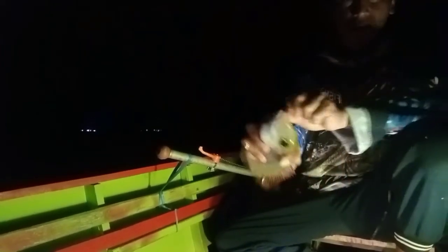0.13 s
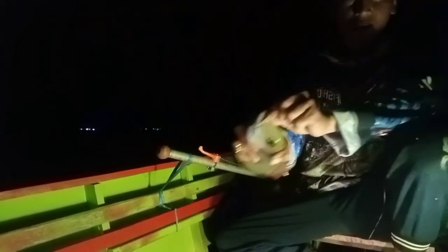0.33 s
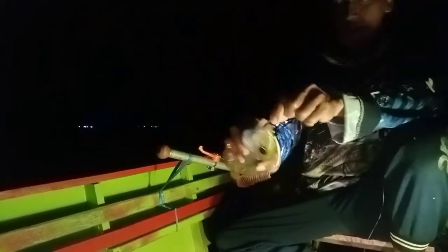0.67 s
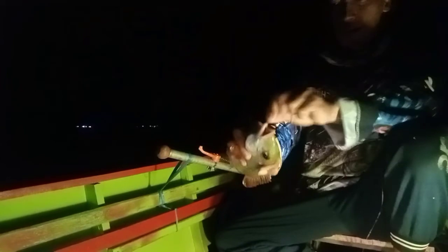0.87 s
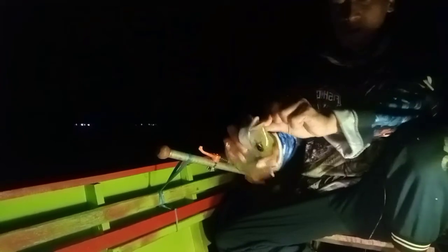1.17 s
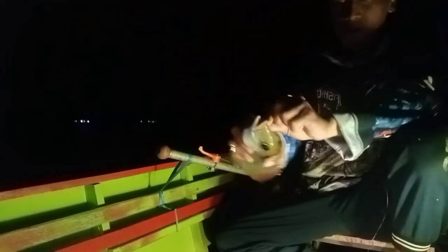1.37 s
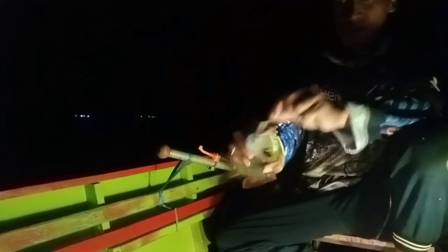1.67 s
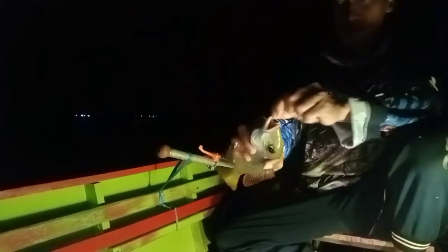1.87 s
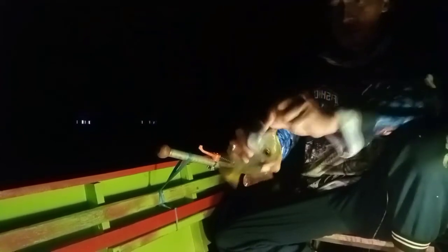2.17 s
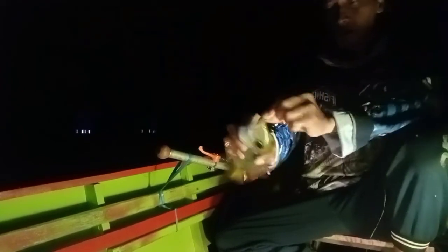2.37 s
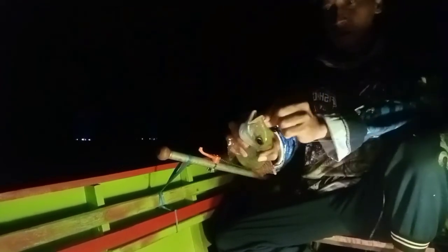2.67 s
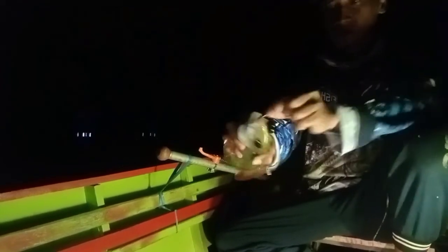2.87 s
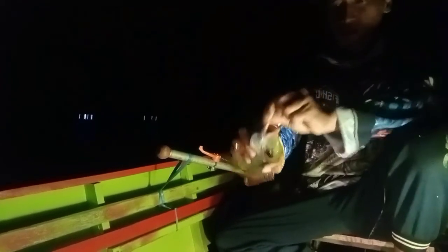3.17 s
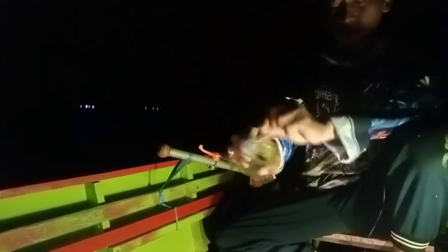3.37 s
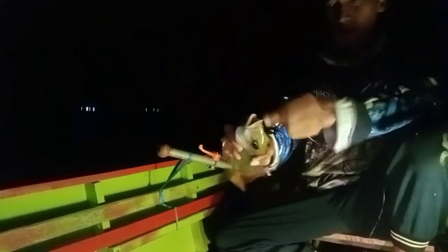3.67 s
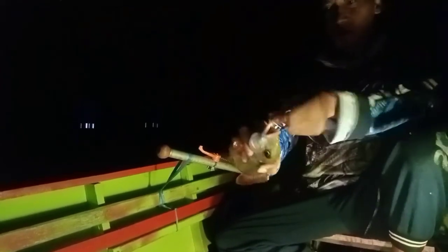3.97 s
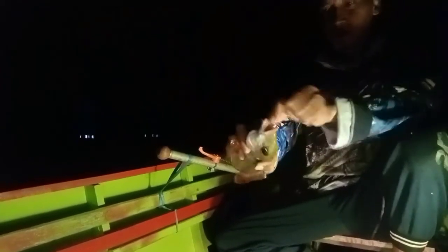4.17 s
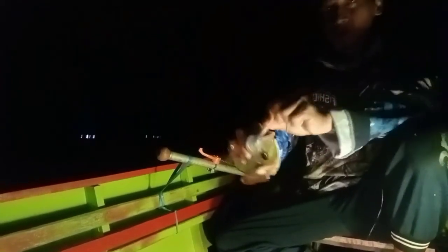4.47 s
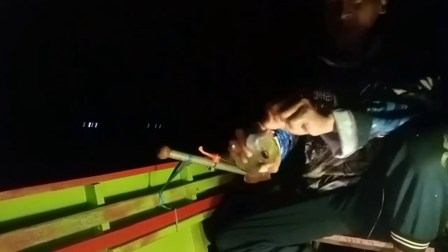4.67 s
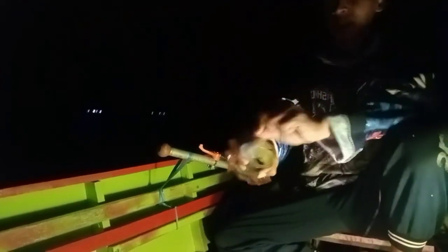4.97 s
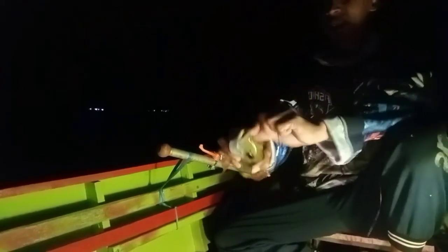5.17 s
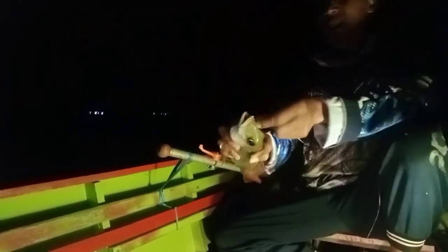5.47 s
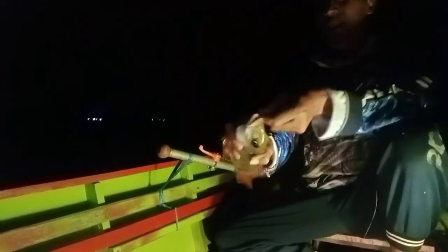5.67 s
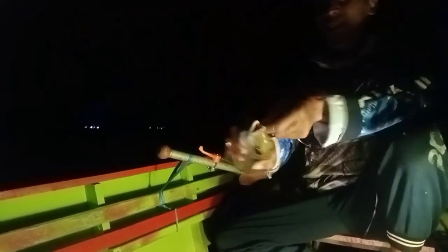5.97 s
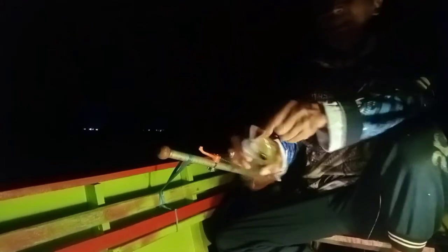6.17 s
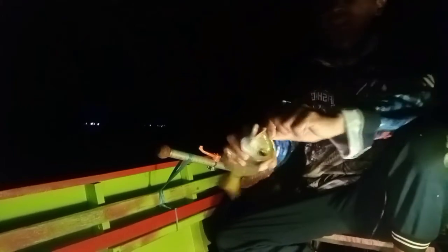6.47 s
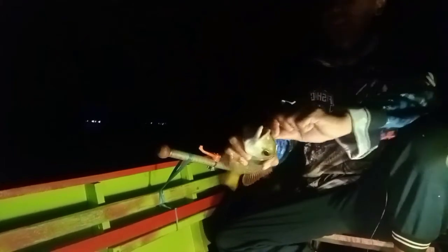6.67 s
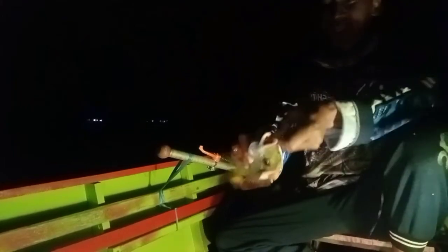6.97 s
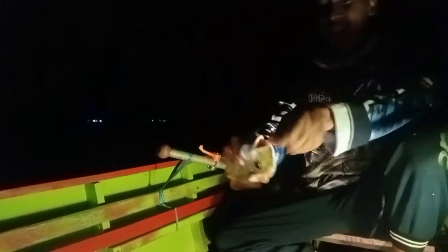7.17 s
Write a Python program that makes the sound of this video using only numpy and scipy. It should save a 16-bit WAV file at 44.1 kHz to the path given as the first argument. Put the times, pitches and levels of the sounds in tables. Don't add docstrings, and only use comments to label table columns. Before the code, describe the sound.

Sparse knocks, bright clicks and wet slaps on a hollow hull, with trickling water, rustling handling and a final heavy slap and low heave.

```python
import sys
import numpy as np
from scipy import signal
from scipy.io import wavfile

SR = 44100
rng = np.random.default_rng(int(sys.argv[2]) if len(sys.argv) > 2 else 0)


def magnitude_from_level(level_db):
    exponent = np.asarray(level_db, float) / 20
    return 10 ** exponent


def log_audio(samples):
    frames = np.atleast_2d(samples).T
    limited = np.clip(frames, -1, 1)
    pcm = np.round(limited * 32767).astype(np.int16)
    wavfile.write(sys.argv[1], SR, pcm)


N = 322787


def rms_one(x):
    return x / np.sqrt(np.mean(x ** 2) + 1e-20)


def peak_one(x):
    return x / (np.max(np.abs(x)) + 1e-20)


def add(track, sound, start_s):
    i = round(start_s * SR)
    track[i:i + len(sound)] += sound[:N - i]


def slow(rate_hz):
    r = np.exp(-80 * np.pi * rate_hz / SR)
    noise = rng.standard_normal(N // 40 + 2002)
    return rms_one(signal.lfilter([1], [1, -2 * r, r * r], noise)[2000:])


def filled(thin):
    return np.interp(np.arange(N) / 40, np.arange(len(thin)), thin)


def drift(rate_hz):
    return filled(slow(rate_hz))


def resonate(x, hz, width_hz):
    r = np.exp(-np.pi * width_hz / SR)
    feed = np.array([1, 0, -1]) * (1 - r * r) / 2
    return signal.lfilter(feed, [1, -2 * r * np.cos(2 * np.pi * hz / SR), r * r], x + 1e-18)


def twice(x, hz, width_hz):
    return resonate(resonate(x, hz, width_hz), hz, 2 * width_hz)


def coloured(spectrum, patchy_db, patch_rate):
    hz_points, db_points = np.transpose(spectrum)
    octaves = np.log2(hz_points[-1] / hz_points[0])
    edges = hz_points[0] * 2 ** np.arange(0, octaves + .3, 1 / 3)
    white = rng.standard_normal((2, N))
    together, out = slow(patch_rate / 2), 0
    for k, (low, high) in enumerate(zip(edges, edges[1:])):
        sos = signal.butter(2, [low, min(high, SR * .45)], "band", fs=SR, output="sos")
        band = signal.sosfilt(sos, white[k % 2])
        level_db = np.interp(np.log(low * high) / 2, np.log(hz_points), db_points)
        flicker_db = patchy_db * (0.66 * together + slow(patch_rate))
        out = out + band * filled(magnitude_from_level(level_db + flicker_db))
    return rms_one(out)


def grains(per_s, low_hz, high_hz, cycles, tilt, spread_db):
    sizes = magnitude_from_level(spread_db * np.minimum(rng.exponential(1, N), 4)) * rng.choice([-1, 1], N)
    born = rng.random(N) < per_s * magnitude_from_level(5.0 * drift(25)) / SR
    pitches, dealt = np.geomspace(low_hz, high_hz, 14), rng.integers(0, 14, N)
    out = np.zeros(N)
    for k, hz in enumerate(pitches):
        out += twice(sizes * born * (dealt == k), hz, 2.22 * hz / cycles) / hz ** tilt
    return rms_one(out)


def swells(rows, calm_db, rise):
    t = np.arange(0, N + 64, 64) / SR
    power = magnitude_from_level(2 * calm_db)
    for start_s, top_db, fade_s in rows:
        away = np.maximum(t - start_s, (start_s - t) / rise) / max(fade_s, .02)
        power = power + magnitude_from_level(2 * (top_db - 20 * away))
    return np.interp(np.arange(N) / SR, t, 10 * np.log10(power))


def burst(noise, rise_s, t60_s):
    t = np.arange(len(noise)) / SR
    return noise * (1 - np.exp(-t / rise_s)) * magnitude_from_level(-60 * t / max(t60_s, .004))


def contact(grit, t60_s):
    tail = burst(grit, 0.00016 + 0.053 * t60_s ** 2, t60_s)
    return tail + magnitude_from_level(11 - 90 * t60_s) * burst(grit, .00003, 0.005)


def pitched(rows, pitch_hz):
    return [(start_s, level_db, pitch_hz, t60_s) for start_s, level_db, t60_s in rows]


def notes_struck(rows, rise_s, width, length):
    out = np.zeros(N)
    for start_s, level_db, pitch_hz, t60_s in rows:
        force = burst(rng.standard_normal(length), rise_s, t60_s)
        add(out, magnitude_from_level(level_db) * peak_one(twice(force, pitch_hz, width * pitch_hz)), start_s - .001)
    return out


# pitch_hz, level_db (per Hz)
HISS = [(71, -29), (125, 18), (834, -5.5), (1200, -4), (4100, -51), (6040, -14.5), (14200, -22.5),
        (15800, -36)]


def hiss():
    return magnitude_from_level(-68.5) * coloured(HISS, patchy_db=.4, patch_rate=6.0)


# pitch_hz, width_hz, level_db
ROD = [(766, 224, -8.5), (1180, 73, 2.5), (1582, 38, -15), (1968, 61, -6), (2350, 36, -11.5),
       (3026, 76, -9.5), (3780, 37, -19.5), (4600, 47, -24), (5200, 150, -17)]


def steady_hum():
    hum = rms_one(twice(rng.standard_normal(N), ROD[1][0], 35.0))
    return magnitude_from_level(-76.5 + 4.7 * drift(1.4)) * hum


# pitch_hz, level_db (per Hz)
RUMBLE = [(13, -16), (22, -31), (52, -1.5), (70, 8.5), (166, -8), (233, -22), (390, -57), (660, -120)]
# start_s, top_db, fade_s (per 20 dB)
HEAVES = [(.04, -44, 0.16), (.53, -43.5, 0), (.69, -57, 0.67), (1.06, -49.5, 0), (1.46, -55, 0.23),
          (1.61, -51, 0.4), (2.03, -47.5, 0.16), (2.24, -51, 0.2), (3.5, -57, 0.65), (4.33, -55.5, .5),
          (4.68, -42.5, 0.1), (4.85, -41.5, 0.28), (5.04, -48.5, 0.11), (5.82, -57, 0.87),
          (6.71, -51.5, 0.38), (7.01, -45, 0.3), (7.13, -33, 0.1), (7.28, -27.5, 0.13)]


def rumble():
    level_db = swells(HEAVES, calm_db=-65.5, rise=0.68)
    return magnitude_from_level(level_db) * coloured(RUMBLE, patchy_db=2.0, patch_rate=6.3)


# start_s, level_db
BUMPS = [(1.81, -34.5), (2.75, -44.5), (4.701, -35), (4.789, -31.5), (5.01, -38.5), (5.66, -38),
         (5.788, -43.5), (6.448, -33), (7.256, -25.5), (7.298, -36)]
KEEL_HZ, PUSH_S = 77.7, 0.0068


def bumps():
    out, t = np.zeros(N), np.arange(-2000, 2000) / SR
    for (start_s, level_db), (spread, turn) in zip(BUMPS, rng.standard_normal((len(BUMPS), 2))):
        hz = KEEL_HZ * 2 ** (0.19 * spread)
        push = np.exp(-.5 * (t / PUSH_S) ** 2) * np.cos(2 * np.pi * hz * t + turn)
        add(out, magnitude_from_level(level_db) * push, start_s + t[0])
    return out


# start_s, top_db, fade_s (per 20 dB)
RUNOFF = [(.01, -61, -1.7), (.98, -55, -0.24), (2.18, -66, 0.45), (2.75, -62, -0.12), (4.2, -59, -0.4),
          (4.33, -46, -0.12), (4.6, -64.5, -0.3), (5.17, -63, 0.2), (5.9, -67, 0.4), (6.2, -60, -0.2),
          (6.92, -55, -0.07), (6.99, -59, -0.37), (7.12, -52, -0.08), (7.23, -55, 0.17)]


def trickle():
    level_db = swells(RUNOFF, calm_db=-72, rise=1)
    drops = grains(per_s=1400.0, low_hz=260, high_hz=3200, cycles=22.0, tilt=.85, spread_db=3.7)
    return magnitude_from_level(level_db - 1.5) * drops


# pitch_hz, level_db (per Hz)
RUSTLE = [(1060, 8), (1800, 4.5), (3540, -0.5), (5450, -3), (6020, -29), (8550, 1), (11800, -24.5),
          (15500, -33)]
# start_s, top_db, fade_s (per 20 dB)
GRIPS = [(.08, -66.5, 1.24), (1.12, -67, 2.9), (2.18, -67, 1.2), (2.75, -69.5, 1), (3.95, -75, -2.1),
         (4.2, -67.5, 19), (4.43, -55, 0.5), (4.58, -65.5, 0.48), (5.12, -65, 0.1), (5.9, -62.5, 0.75),
         (6.34, -66.5, 1), (6.99, -60, 0.15), (7.11, -57, 0.5), (7.3, -65, -2)]


def rustle():
    level_db = swells(GRIPS, calm_db=-78.5, rise=0.37)
    crackle = grains(per_s=800.0, low_hz=2500, high_hz=9500, cycles=24.0, tilt=1.1, spread_db=4.2)
    rub = magnitude_from_level(1.32 * drift(43)) * coloured(RUSTLE, patchy_db=2.5, patch_rate=36.0)
    crackle_db = -8 + .55 * (level_db + 60)
    return magnitude_from_level(level_db) * (magnitude_from_level(-2.5) * rub + magnitude_from_level(crackle_db) * crackle)


# start_s, length_s, level_db
SLIDES = [(0.01, 0.18, -79), (0.305, 0.47, -74.5), (.77, 0.27, -61), (1.103, 0.28, -71),
          (1.834, 0.33, -67.5), (2.8, .2, -69.5), (3.564, 0.18, -76.5), (3.81, 0.32, -63.5),
          (4.31, 0.32, -63), (4.8, 0.29, -68.5), (5.91, .14, -63.5), (6.201, 0.26, -71), (6.832, 0.25, -60)]


def rod():
    t = np.arange(0, N + 64, 64) / SR
    grip = magnitude_from_level(-123)
    for start_s, length_s, level_db in SLIDES:
        inside_s = np.minimum(t - start_s, start_s + length_s - t)
        grip = grip + magnitude_from_level(level_db) * np.clip(inside_s / 0.033, 0, 1)
    friction = rng.standard_normal(N) * magnitude_from_level(1.9 * drift(32))
    modes = sum(filled(magnitude_from_level(db + 3.7 * slow(14.6))) * twice(friction, hz, width) for hz, width, db in ROD)
    scrape = rms_one(twice(friction, 1300, 1200))
    return np.interp(np.arange(N) / SR, t, grip) * (rms_one(modes) + magnitude_from_level(-15.5) * scrape)


# start_s, level_db, pitch_hz, t60_s
DRIPS = [(.809, -62, 1160, .05), (.845, -56, 1120, 0.053), (.845, -66, 1920, .06), (.94, -57, 3400, 0.07),
         (.775, -61, 2460, .08), (2.265, -49, 3600, 0.023), (2.218, -56, 4670, 0.066),
         (2.12, -59, 3620, 0.047), (2.132, -56, 1270, 0.05), (3.815, -55, 1180, 0.049),
         (3.878, -54, 1180, 0.035), (3.99, -62, 4300, .07), (4.651, -55.5, 2040, .04),
         (4.85, -54.5, 1210, .04), (4.904, -58, 1570, .04), (4.935, -65, 3750, .06),
         (4.935, -62, 2250, 0.11), (5.082, -63, 3800, 0.042), (5.087, -51, 1435, 0.061),
         (5.133, -54, 2260, 0.067), (5.182, -54, 1570, 0.079), (5.182, -63.5, 3720, 0.031),
         (5.281, -66.5, 1200, 0.04), (6.0, -57.5, 1500, 0.055), (6.13, -45, 2650, 0.027),
         (6.215, -58.5, 2380, 0.055), (6.292, -54, 1140, .03), (6.309, -55, 3330, .06),
         (6.344, -62, 3370, 0.032), (6.479, -50.5, 3600, .04), (6.624, -57.5, 2000, 0.22),
         (6.832, -55, 594, .05), (6.832, -57, 1160, .05), (6.866, -57, 2950, 0.029),
         (6.897, -50.5, 694, .04), (6.912, -51, 767, 0.17), (6.95, -45.5, 700, .1), (6.978, -51, 750, .05),
         (6.996, -50, 626, .03), (7.01, -48.5, 590, .06), (7.032, -46, 2000, .04), (7.03, -47, 5370, 0.025),
         (7.043, -55, 610, .04), (7.063, -49, 2700, .06), (7.082, -52, 4400, 0.036),
         (.068, -47.5, 4600, 0.15), (.11, -57.5, 6900, 0.051), (.173, -63, 5200, .12)]


def drips():
    return notes_struck(DRIPS, rise_s=0.00054, width=0.12, length=4000)


# start_s, level_db, pitch_hz, t60_s
TAPS = [(1.857, -51, 1970, 0.055), (1.89, -50.5, 3100, .06), (1.892, -53, 1200, .1),
        (1.893, -49.5, 485, 0.083), (1.895, -55, 6400, .08), (2.085, -57, 3550, .06), (2.0, -60, 5600, .06),
        (3.231, -55, 2600, .12), (3.28, -60, 2600, .1), (2.955, -59, 1180, .2), (3.21, -58, 1150, .15),
        (5.862, -41, 1440, .1), (5.875, -42, 1110, .12), (.045, -43.5, 4400, 0.11), (.05, -48, 2000, 0.16),
        (2.3, -36.5, 420, .1), (.78, -52, 610, 0.088), (5.4, -57, 810, .06), (5.72, -61, 8400, .06),
        (6.8, -61.5, 8800, .08), (6.845, -61, 8200, .05), (4.748, -56, 8300, .03)]


def taps():
    return notes_struck(TAPS, rise_s=0.0013, width=0.14, length=6000)


# start_s, level_db
TEARS = [(4.3065, -45), (4.375, -52), (4.389, -49), (4.419, -37), (4.439, -41), (4.4464, -41),
         (4.4626, -50), (4.4744, -57), (4.4844, -49), (4.5307, -44), (4.5401, -39), (4.5554, -51),
         (4.5724, -41), (4.5844, -48), (4.605, -53), (4.6144, -49), (4.6907, -46), (5.912, -40),
         (5.941, -40), (5.9808, -49), (6.1044, -48), (6.114, -43), (6.3194, -51.5), (6.386, -46),
         (6.4562, -46), (6.9596, -36), (6.9674, -41), (6.9844, -41)]
# pitch_hz, width_hz, level_db
FILM = [(3600, 2900, 5), (6460, 920, 1), (8600, 1300, -5.5)]


def tears():
    out = np.zeros(N)
    for start_s, level_db in TEARS:
        force = burst(rng.standard_normal(1500), 0.00036, 0.026)
        chances = rng.standard_normal(len(FILM))
        click = sum(magnitude_from_level(db + 4.5 * z) * twice(force, hz, width) for (hz, width, db), z in zip(FILM, chances))
        add(out, magnitude_from_level(level_db - 8) * peak_one(click), start_s - .0004)
    return out


# start_s, length_s, first_hz, last_hz, level_db
GURGLES = [(4.356, 0.058, 570, 683, -48), (4.362, 0.05, 940, 1120, -52.5), (4.414, 0.053, 713, 837, -55),
           (4.54, 0.036, 660, 650, -57), (4.619, 0.028, 650, 770, -54.5), (7.034, 0.085, 1690, 1634, -54.5),
           (2.193, 0.059, 2700, 2580, -58)]


def gurgles():
    out = np.zeros(N)
    for start_s, length_s, first_hz, last_hz, level_db in GURGLES:
        u = np.linspace(0, 1, round(length_s * SR))
        flutter = drift(120)[:len(u)] * np.sqrt(first_hz / 700)
        hz = (first_hz + (last_hz - first_hz) * u ** 2) * (1 + 0.0089 * flutter[::-1])
        shape = np.sin(np.pi * u ** 0.64) * magnitude_from_level(2.6 * flutter)
        add(out, magnitude_from_level(level_db) * shape * np.sin(2 * np.pi * np.cumsum(hz) / SR), start_s)
    return out


# start_s, level_db, t60_s
SPARKS = [(.0383, -44, 0.046), (1.9, -55, 0.063), (2.2797, -58, .03), (2.6574, -49, 0.059),
          (2.7352, -49.5, 0.065), (3.0046, -68, .06), (3.1896, -51, 0.046), (6.127, -61, 0.034),
          (6.274, -67, .05), (6.6508, -66, .02), (6.958, -44.5, 0.074), (7.0284, -61, .04),
          (7.19, -62, .05)]


def sparks():
    return notes_struck(pitched(SPARKS, 13570), rise_s=0.0013, width=0.14, length=6000)


# start_s, level_db, t60_s
FINS = [(.0383, -30, 0.058), (.6225, -52, 0.13), (1.568, -53.5, 0.14), (1.8836, -56, 0.039),
        (1.9001, -37, 0.085), (1.9954, -49.5, 0.16), (2.2518, -42, 0.026), (2.2806, -22.5, 0.077),
        (2.6574, -32.5, 0.073), (2.7352, -38.5, 0.092), (2.806, -55, .05), (2.8564, -56, 0.11),
        (3.1896, -43.5, 0.043), (3.5299, -44, 0.061), (3.8751, -52, 0.12), (4.1929, -53.5, 0.11),
        (4.4727, -41.5, 0.044), (4.5785, -48.5, 0.073), (4.6833, -51.5, 0.16), (5.7708, -40.5, 0.065),
        (5.895, -47, 0.13), (6.127, -37, 0.036), (6.1584, -45.5, 0.072), (6.4497, -55, 0.13),
        (6.6508, -44.5, 0.032), (6.957, -38, 0.11), (7.0304, -39.5, .027), (7.0668, -41.5, .045)]
# start_s, level_db
SCALES = [(2.1176, -53), (2.99, -55.5), (3.1433, -58), (3.162, -51), (3.2, -46), (3.232, -50), (3.329, -55),
          (4.2724, -53), (4.3745, -57), (4.7716, -52), (4.792, -43), (4.8646, -34), (5.116, -58),
          (5.136, -58), (5.853, -47.5), (5.945, -48), (6.112, -45), (6.275, -45.5), (6.307, -46),
          (7.1594, -41.5), (7.195, -51)]
FIN_HZ, SCALE_HZ, SCALE_T60_S = 8860, 6980, 0.043


def snaps():
    cracks = pitched(FINS, FIN_HZ) + [(s, db, SCALE_HZ, SCALE_T60_S) for s, db in SCALES]
    out, draws = np.zeros(N), rng.standard_normal((len(cracks), 5000))
    for (start_s, level_db, hz, t60_s), grit in zip(cracks, draws):
        force = contact(grit, t60_s)
        body = twice(force, hz, 0.4 * hz)
        ring = twice(force, hz * 2 ** (0.086 * grit[-1]), 350.0)
        crack = twice(force, 6400, 2500)
        snap = peak_one(body + magnitude_from_level(5.5) * ring + magnitude_from_level(-2.5) * crack)
        add(out, magnitude_from_level(level_db) * snap, start_s - .0004)
    return signal.sosfilt(signal.butter(3, 10800, fs=SR, output="sos"), out)


# start_s, level_db, t60_s
SINKER = [(.0387, -48, 0.02), (2.658, -35, 0.084), (2.7488, -38, 0.063), (3.1618, -49, 0.15),
          (4.2705, -28.5, 0.1), (4.3745, -47.5, 0.07), (4.58, -44.5, 0.065), (4.79, -23, 0.056),
          (5.863, -41.5, 0.076), (6.373, -44.5, 0.11), (6.8676, -48.5, 0.024), (7.115, -39, 0.02)]
# start_s, level_db, t60_s
HOOK = [(.0384, -26, 0.05), (1.0243, -47.5, 0.18), (1.0637, -50.5, 0.083), (1.568, -45, 0.11),
        (1.6912, -48.5, 0.073), (1.7056, -44.5, 0.039), (1.8989, -48.5, 0.093), (2.2806, -27.5, 0.053),
        (2.885, -53.5, 0.15), (3.1892, -42, 0.031), (3.199, -42, 0.065), (3.5305, -41, 0.054),
        (4.167, -48.5, 0.27), (4.236, -43.5, 0.11), (4.2557, -40.5, 0.15), (4.514, -53, 0.13),
        (4.539, -45.5, 0.078), (4.7484, -42, 0.12), (6.128, -47, 0.037), (6.3844, -49, 0.032)]
# start_s, level_db, pitch_hz, t60_s
SWIVEL = [(0.478, -51, 4300, 0.07), (1.2231, -53.5, 4220, 0.065), (2.2527, -39.5, 3740, 0.024),
          (2.545, -59.5, 5300, 0.3), (2.992, -61, 4600, 0.099), (3.022, -57.5, 4900, 0.057),
          (3.1433, -54, 5200, 0.082), (4.3898, -47, 3800, 0.079), (4.438, -45.5, 3320, 0.032),
          (4.6055, -45.5, 5100, 0.053), (5.682, -50.5, 4170, 0.094), (5.7455, -45.5, 4440, 0.042),
          (5.7663, -31, 4360, 0.061), (6.1587, -52.5, 4840, 0.14), (6.2751, -30, 3850, 0.041),
          (6.4855, -45, 3140, .054), (6.5864, -50, 4230, 0.066), (6.9639, -44.5, 3300, 0.084),
          (7.014, -49, 3820, 0.18), (7.03, -32, 4370, 0.032), (7.063, -47, 3870, 0.11),
          (7.1583, -28.5, 3780, 0.038), (7.1968, -30.5, 3930, 0.036)]
# pitch_hz, width_hz, level_db
TACKLE = [(2664, 118, 2.5), (3553, 234, 3), (4370, 460, -5)]
SINKER_HZ, HOOK_HZ = 2000, 2694


def ticks():
    touches = pitched(SINKER, SINKER_HZ) + pitched(HOOK, HOOK_HZ) + SWIVEL
    out, draws = np.zeros(N), rng.standard_normal((len(touches), 5000))
    for (start_s, level_db, hz, t60_s), grit in zip(touches, draws):
        force = contact(grit, t60_s)
        part = twice(force, hz, 0.23 * hz)
        tackle = sum(magnitude_from_level(db + 2.0 * z) * twice(force, f, width) for (f, width, db), z in zip(TACKLE, grit[::-1]))
        add(out, magnitude_from_level(level_db) * peak_one(part + magnitude_from_level(-6.5) * tackle), start_s - .0004)
    return out


# start_s, level_db, pitch_hz, t60_s
ANSWERS = [(.04, -30, 216, 0.07), (.047, -30, 329, 0.14), (.037, -44, 1240, .05), (.07, -47, 1320, 0.047),
           (1.024, -33.5, 358, 0.11), (1.046, -36, 379, 0.13), (1.078, -28.5, 1290, 0.055),
           (4.271, -30, 590, 0.089), (4.163, -34.5, 1005, 0.12), (4.163, -31, 1770, 0.098),
           (4.29, -32, 184, 0.11), (5.866, -23.5, 405, 0.087), (5.9, -30.5, 330, .1),
           (5.905, -43, 790, .08), (7.116, -34, 439, 0.071)]


def answers():
    return notes_struck(ANSWERS, rise_s=0.0013, width=0.14, length=6000)


# start_s, level_db, pitch_hz, t60_s
POCKETS = [(.026, -52, 1210, 0.29), (1.016, -47, 860, 0.12), (1.077, -26.5, 1202, 0.096),
           (1.559, -53, 965, 0.16), (2.131, -54.5, 766, 0.075), (2.293, -30, 1044, 0.11),
           (2.314, -27, 805, 0.082), (2.629, -47, 784, 0.12), (2.661, -37, 1220, 0.055),
           (2.694, -35.5, 1053, 0.12), (2.744, -42.5, 1280, 0.072), (2.805, -43, 1050, 0.083),
           (2.847, -50.5, 1160, 0.1), (3.53, -48.5, 1300, 0.074), (4.162, -28, 1390, 0.08),
           (4.201, -43, 1220, 0.37), (4.239, -37.5, 1170, 0.21), (4.26, -30.5, 1250, 0.081),
           (4.274, -24, 1213, 0.076), (4.785, -35, 1294, 0.07), (4.862, -41.5, 1370, 0.041),
           (5.795, -49, 900, 0.026), (5.87, -43.5, 727, 0.39), (5.939, -44.5, 1180, 0.053),
           (6.093, -51.5, 866, 0.12), (6.151, -49, 1205, 0.084), (6.863, -50.5, 1120, 0.043),
           (6.954, -39, 1200, 0.2), (7.111, -38, 736, 0.071), (7.115, -25, 1177, 0.049)]


def pockets():
    out, noise = np.zeros(N), rng.standard_normal((len(POCKETS), 12000))
    for (start_s, level_db, hz, t60_s), squeeze in zip(POCKETS, noise):
        force = burst(squeeze, 0.0039, t60_s)
        pocket = twice(force, hz, 0.16 * hz) + magnitude_from_level(-8.5) * twice(force, 0.7 * hz, 0.52 * hz)
        spray = twice(force, 1900, 1300)
        add(out, magnitude_from_level(level_db + 1.5) * (peak_one(pocket) + magnitude_from_level(-21) * peak_one(spray)), start_s - .003)
    return out


# start_s, level_db, pitch_hz, t60_s
THUDS = [(.026, -29.5, 305, 0.21), (.066, -32, 284, 0.11), (0.188, -43.5, 339, 0.14),
         (1.016, -29.5, 227, 0.21), (1.033, -36, 244, 0.044), (1.05, -30.5, 342, 0.059),
         (1.077, -32, 584, 0.078), (2.293, -38.5, 214, 0.28), (2.314, -29.5, 610, .11),
         (2.553, -51.5, 392, 0.29), (2.629, -52, 710, 0.53), (2.661, -30.5, 249, 0.025),
         (2.693, -36.5, 221, 0.2), (2.743, -48, 157, .067), (2.804, -51.5, 740, 0.3),
         (2.848, -51.5, 262, 0.16), (4.164, -31, 610, 0.2), (4.199, -39.5, 384, 0.6),
         (4.24, -36.5, 214, 0.46), (4.261, -30.5, 166, 0.16), (4.274, -24, 192, 0.13),
         (4.995, -40, 166, 0.15), (5.121, -46, 645, .09), (5.862, -23.5, 294, 0.11),
         (5.872, -16.5, 328, .17), (7.008, -43.5, 590, 0.48), (7.111, -26, 273, 0.22),
         (7.116, -17.5, 580, 0.082), (7.139, -27, 580, 0.15)]


def thuds():
    out, noise = np.zeros(N), rng.standard_normal((len(THUDS), 12000))
    for (start_s, level_db, hz, t60_s), push in zip(THUDS, noise):
        force = burst(push, 0.0019, t60_s) + magnitude_from_level(3.0) * burst(push, 0.0047, 0.05)
        plank = twice(force, hz, 0.19 * hz) + magnitude_from_level(-6.0) * twice(force, 0.72 * hz, 0.49 * hz)
        add(out, magnitude_from_level(level_db) * peak_one(plank), start_s - .003)
    return out


def slaps():
    return signal.sosfilt(signal.butter(4, 3800, fs=SR, output="sos"), thuds() + pockets())


def scene():
    background = hiss() + steady_hum() + rumble() + bumps()
    water = trickle() + drips() + gurgles() + slaps() + answers()
    handling = rustle() + rod() + taps() + tears() + sparks() + snaps() + ticks()
    return 2 * (background + water + handling) * [[0], [1]]


def band_limit(x):
    return signal.sosfilt(signal.butter(12, 15910, fs=SR, output="sos"), x)


# pitch_hz, width_hz, boost_db
PORT = (14240, 2700, 3.8)
# pitch_hz, width_hz, share_removed (0-1)
DIPS = [(5990, 360, 0.65), (7650, 360, 0.43)]


def record(dry):
    port_hz, port_width_hz, boost_db = PORT
    lift = magnitude_from_level(boost_db) * twice(dry, port_hz, port_width_hz)
    shade = sum(share * resonate(dry, hz, width_hz) for hz, width_hz, share in DIPS)
    top_cut = signal.ellip(3, .5, 8, 14800, fs=SR, output="sos")
    return band_limit(signal.sosfilt(top_cut, dry + lift - shade))


dry = scene()
out = record(dry)
log_audio(out)
```